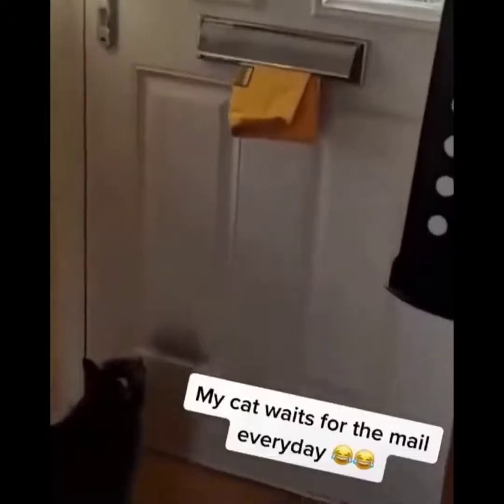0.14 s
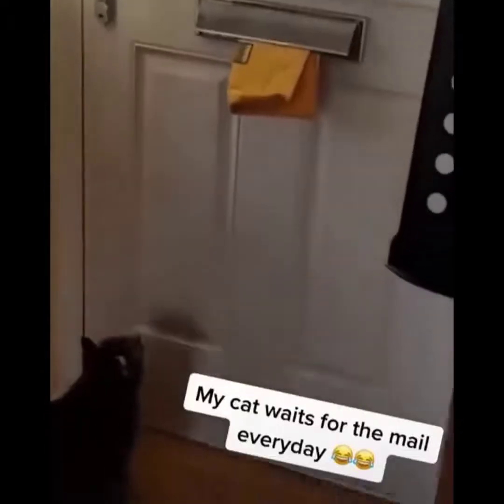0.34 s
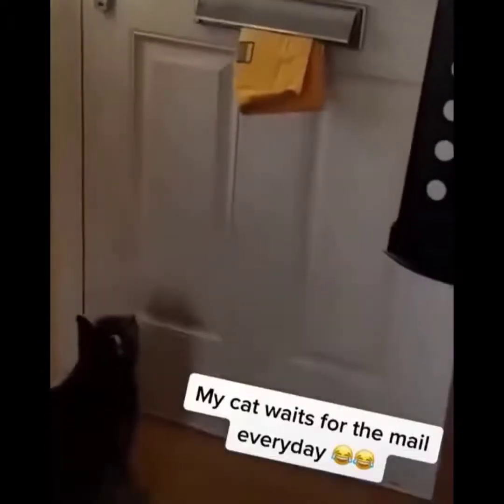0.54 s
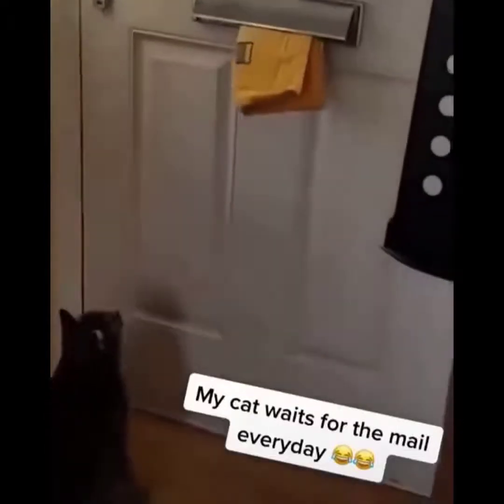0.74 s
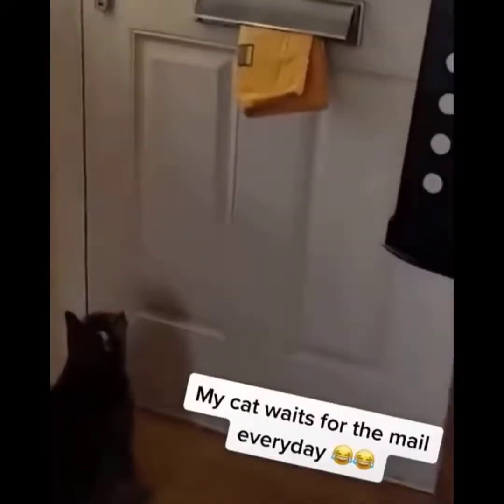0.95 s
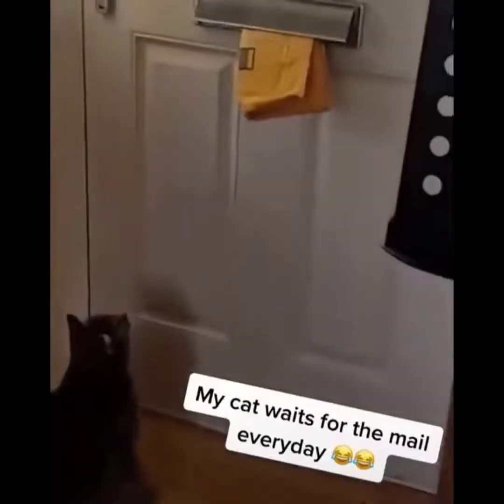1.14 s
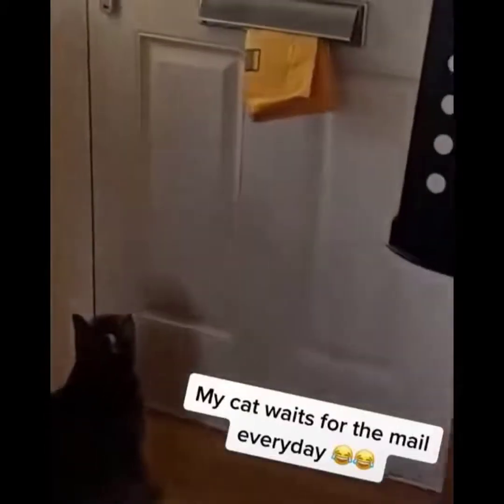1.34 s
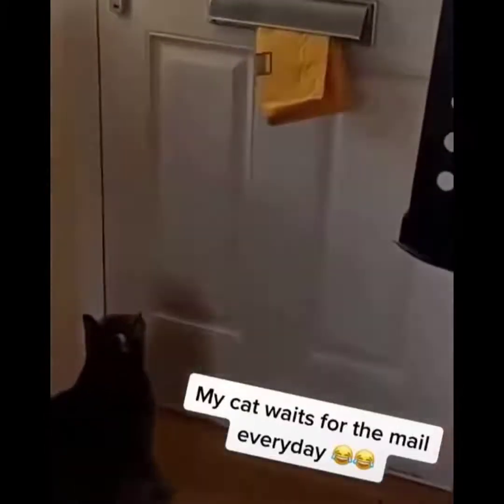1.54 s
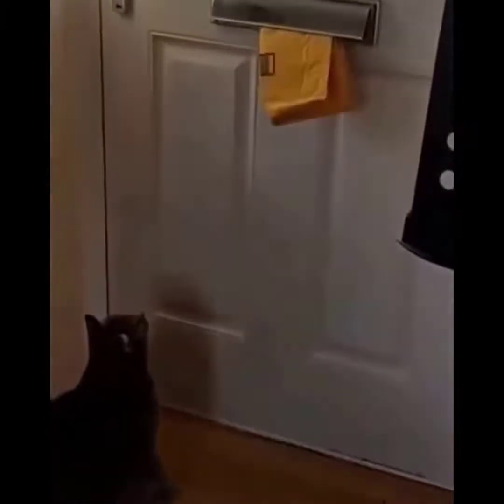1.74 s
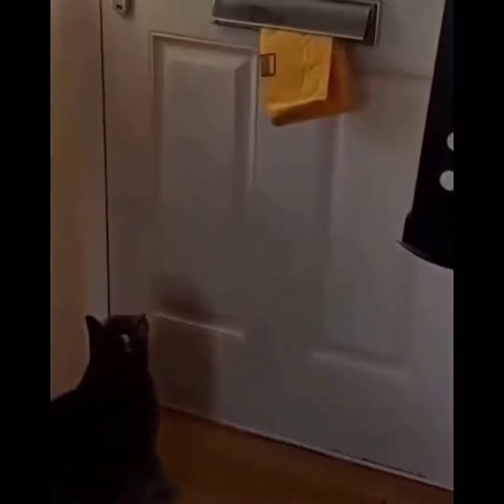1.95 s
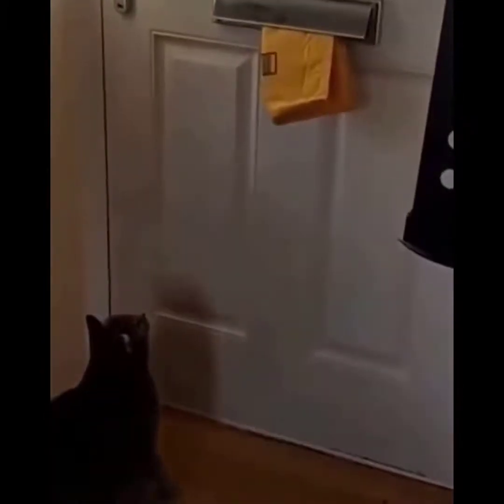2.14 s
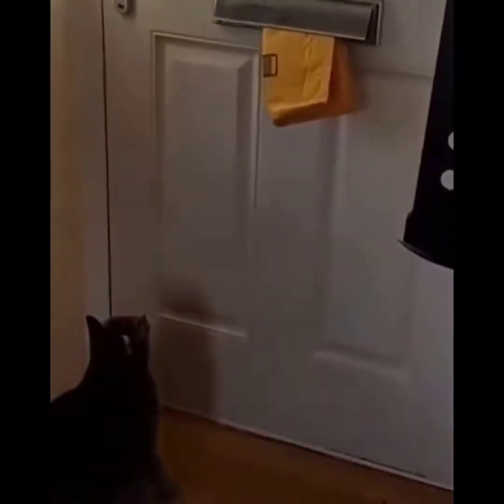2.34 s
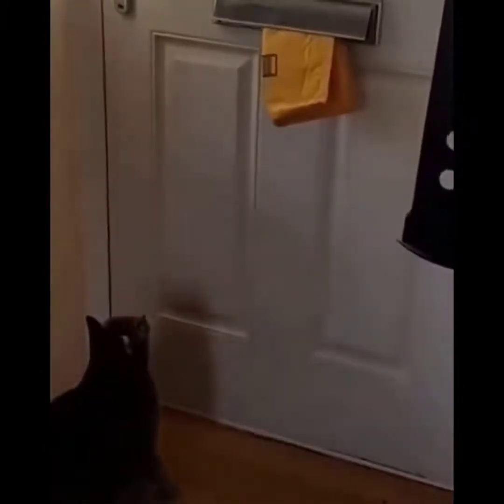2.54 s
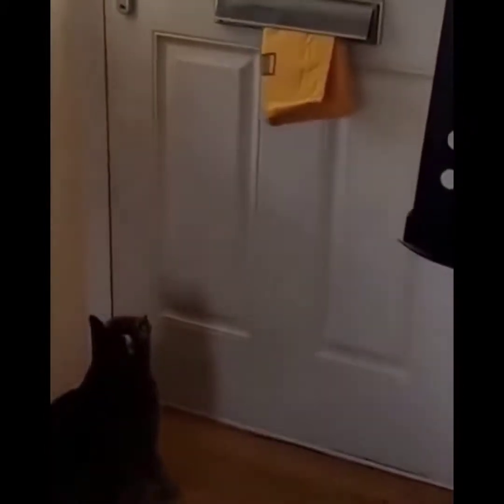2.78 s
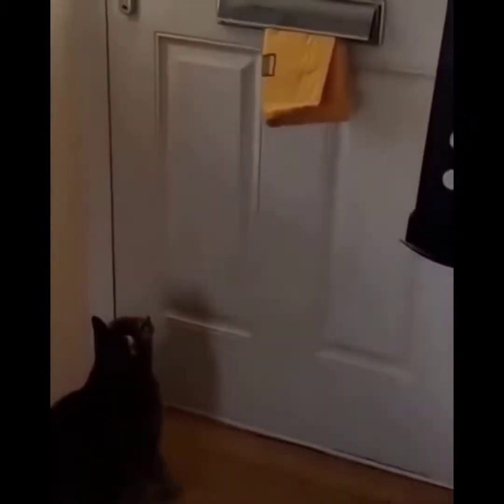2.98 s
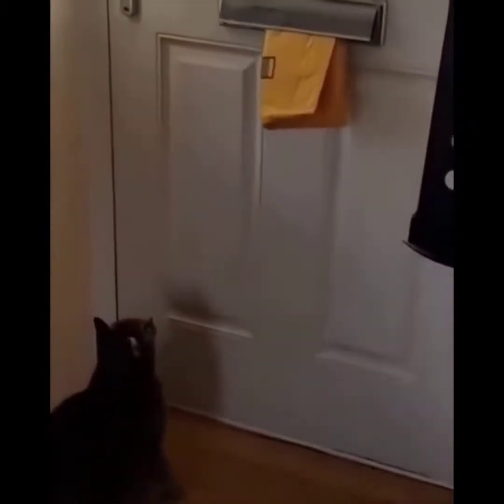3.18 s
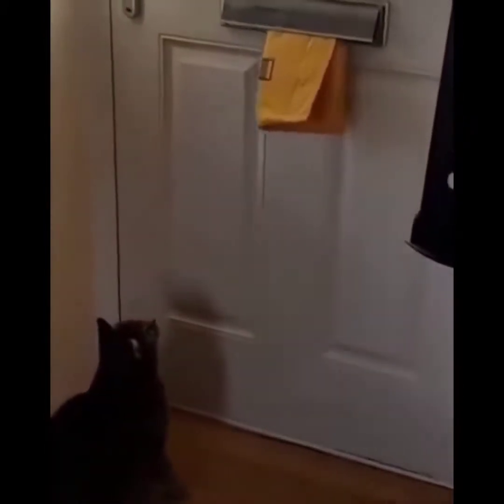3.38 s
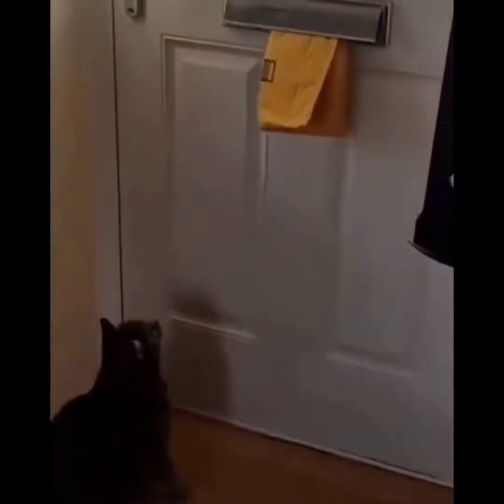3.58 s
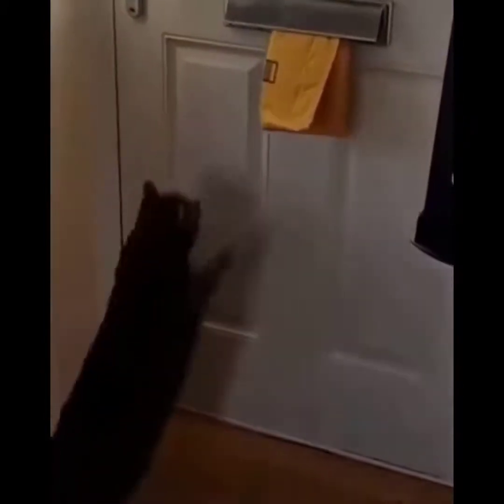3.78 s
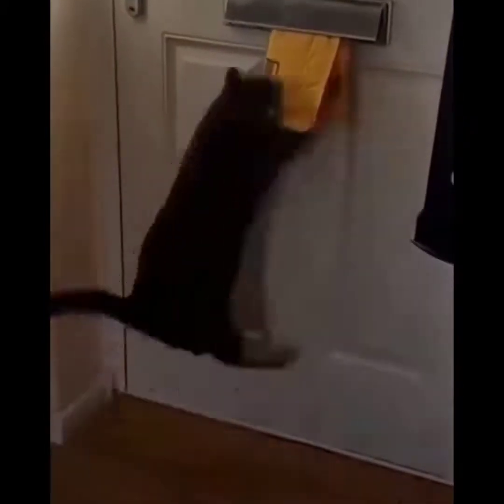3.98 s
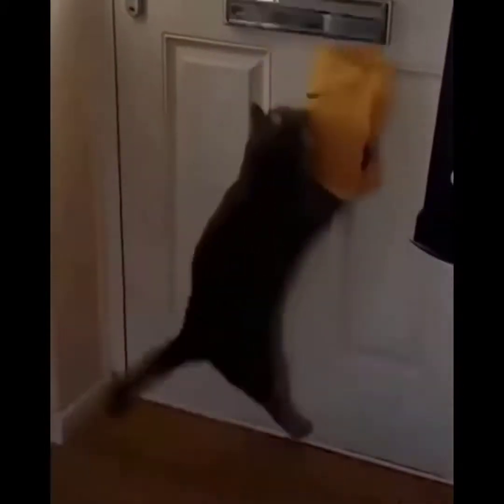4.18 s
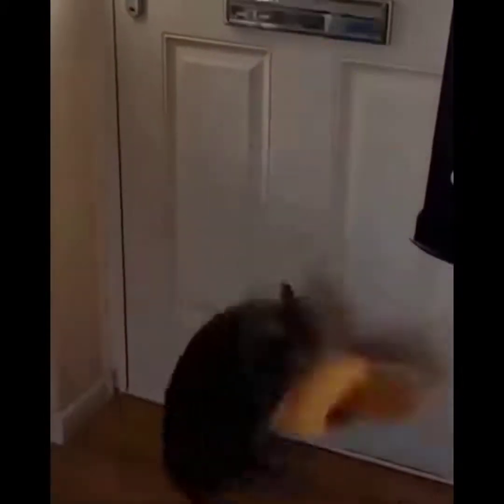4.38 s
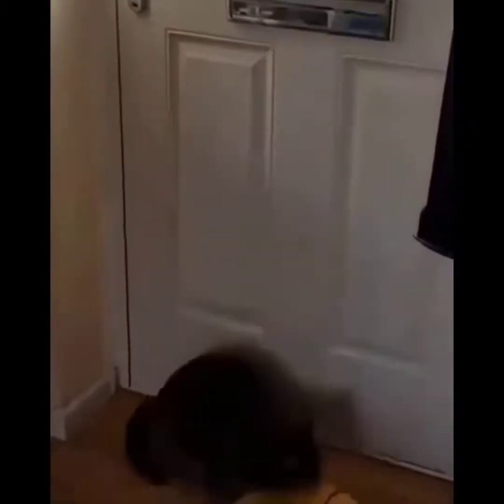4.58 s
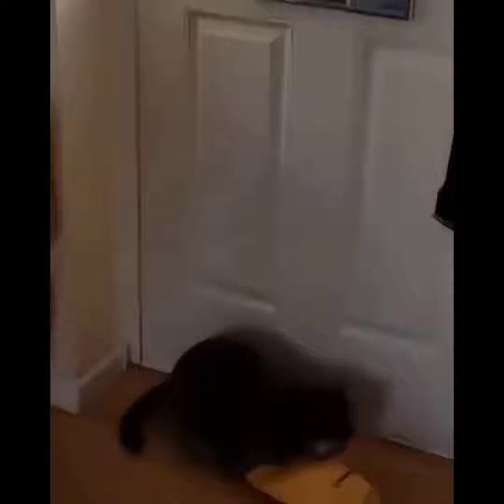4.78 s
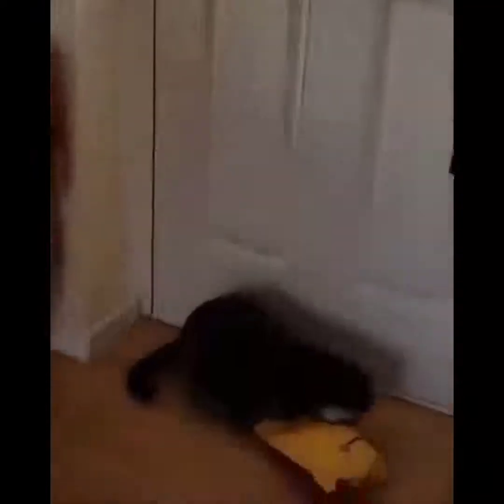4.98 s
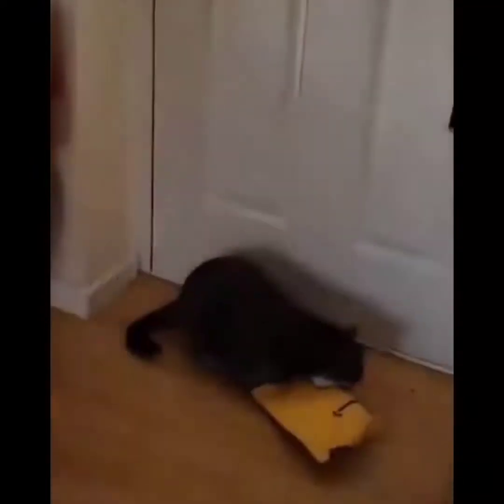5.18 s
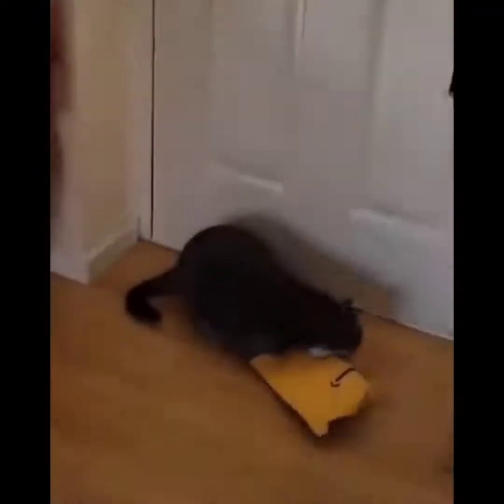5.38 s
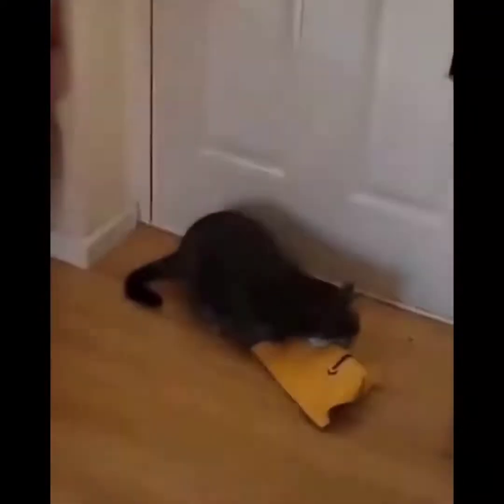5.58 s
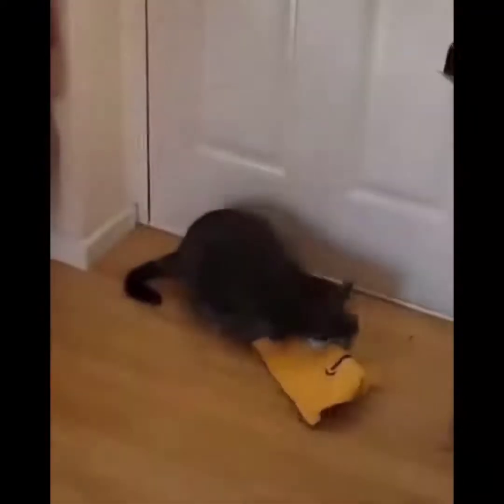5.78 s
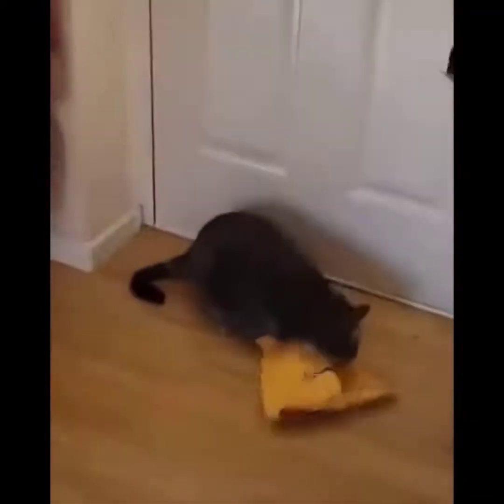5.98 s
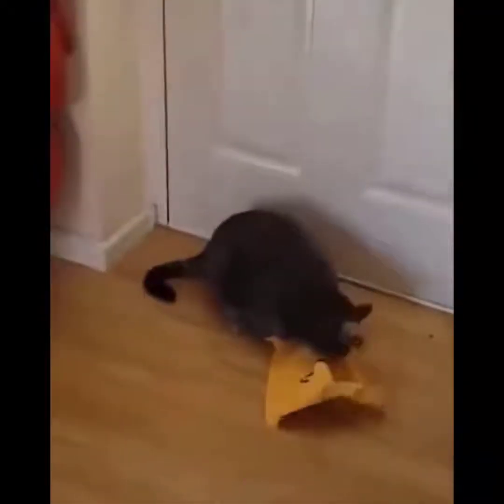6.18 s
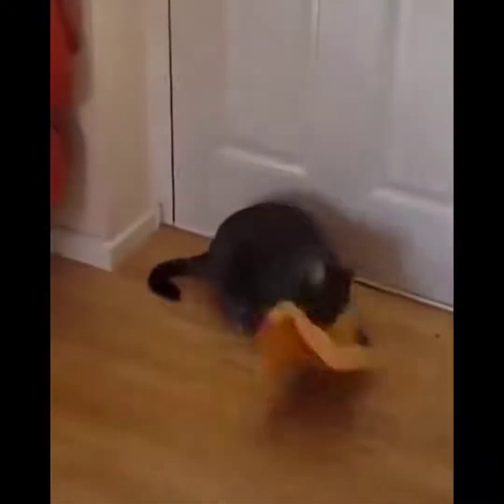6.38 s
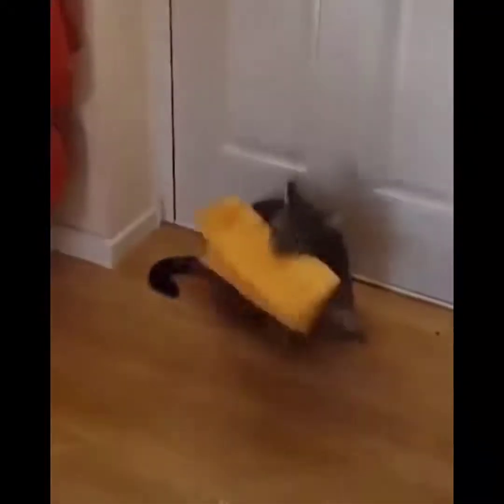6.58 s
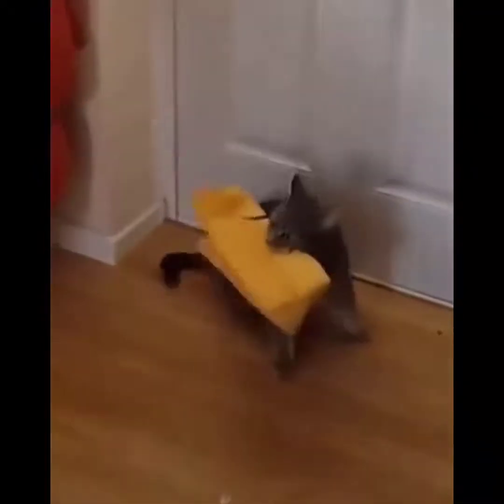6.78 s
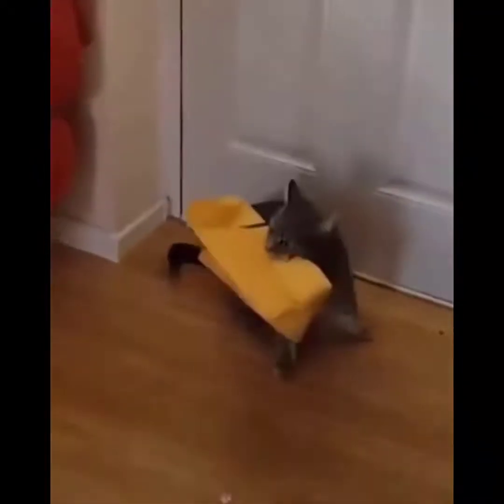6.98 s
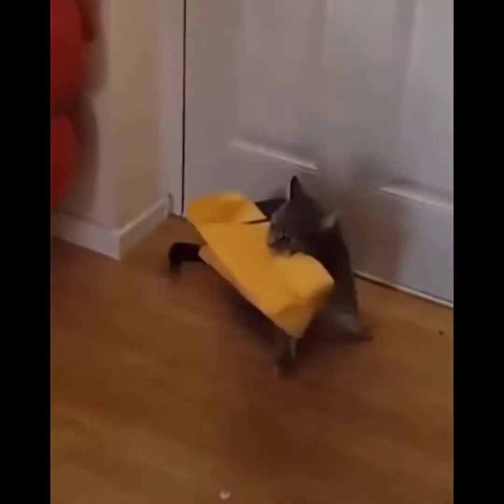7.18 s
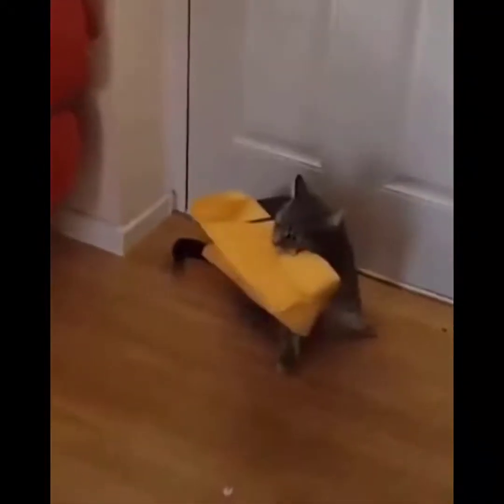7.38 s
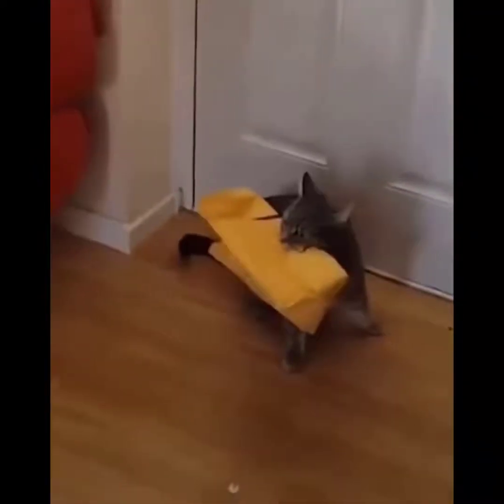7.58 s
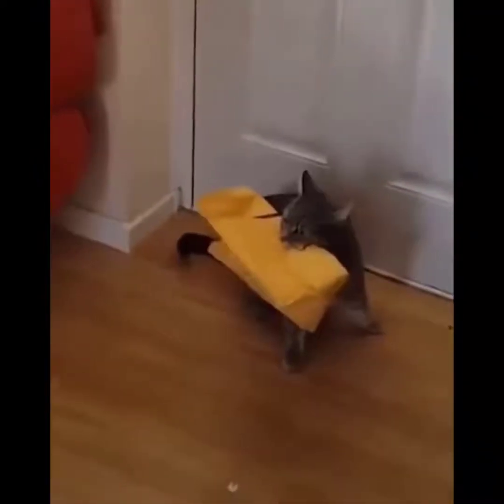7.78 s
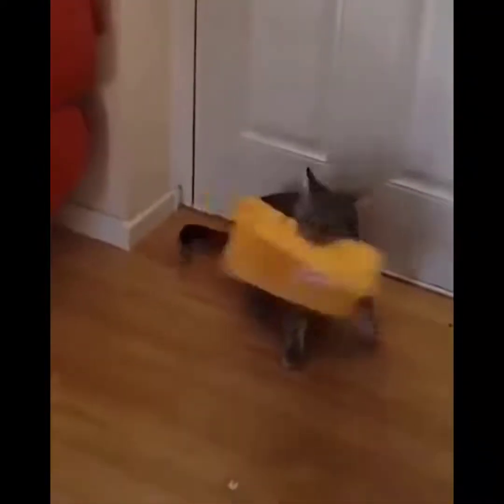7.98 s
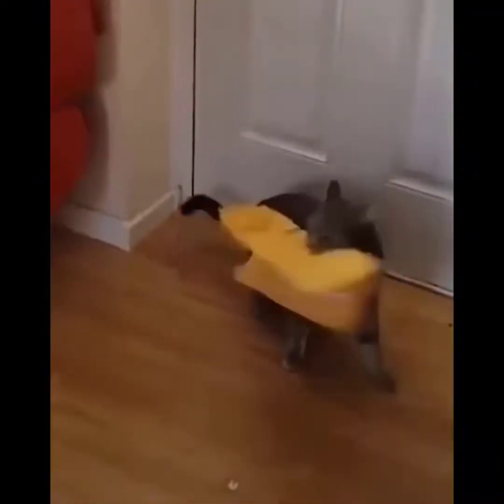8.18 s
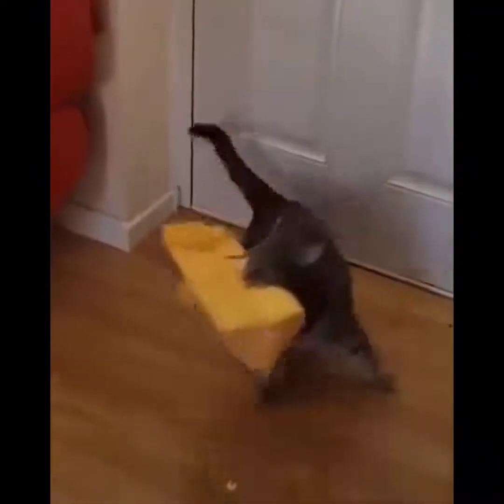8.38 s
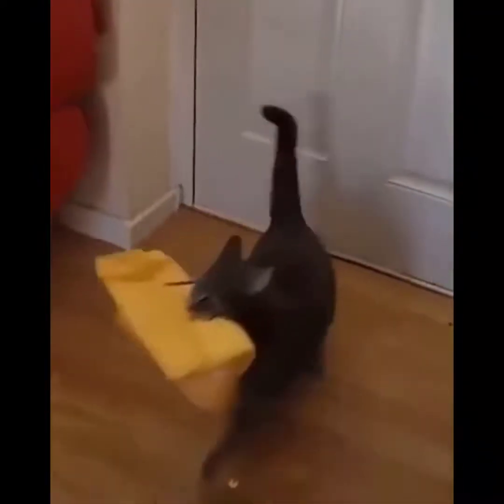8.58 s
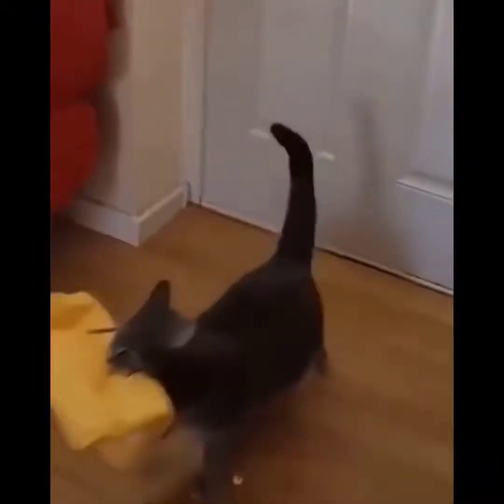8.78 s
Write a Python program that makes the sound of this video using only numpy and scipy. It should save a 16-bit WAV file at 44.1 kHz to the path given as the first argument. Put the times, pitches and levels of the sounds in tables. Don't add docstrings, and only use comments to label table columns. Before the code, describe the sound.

Soft papery rustles and a low engine hum outside open the scene. A harsh scraping rip, heavy wooden door thuds and a bright metal clack burst out, then a sharp flat slap on boards. Claws and teeth prick and crumple the stiff envelope, ending with a tear-like crack, faint rustle and a dull paw landing. Close indoor microphone, short hard-walled echo, muffled extreme treble.

```python
import sys
import numpy as np
from scipy import signal
from scipy.fft import rfft, irfft
from scipy.io import wavfile

SR = 44100
rng = np.random.default_rng(int(sys.argv[2]) if len(sys.argv) > 2 else 0)


def gain_from_db(level_db):
    decades = np.asarray(level_db, float) / 20
    return 10 ** decades


def pcm_store(signal):
    levels = np.round(np.clip(np.atleast_2d(signal), -1, 1) * 32767)
    wavfile.write(sys.argv[1], SR, levels.astype(np.int16).T)


N = 389844


def rms_one(x):
    return x / np.sqrt(np.mean(x ** 2) + 1e-20)


def in_time(rows):
    s, *columns = np.transpose(rows)
    return [np.interp(np.arange(N) / SR, s, c, right=c[-1]) for c in columns]


def at_hz(points, hz):
    point_hz, point_db = np.array(points)[:, 0], np.array(points)[:, 1]
    return np.interp(np.log(hz), np.log(point_hz), point_db)


def drift(rate):
    r = np.exp(-80 * np.pi * rate / SR)
    slow = signal.lfilter([1], [1, -2 * r, r * r], rng.standard_normal(N // 40 + 2002))[2000:]
    return np.interp(np.arange(N) / 40, np.arange(len(slow)), rms_one(slow))


def band(x, low_hz, high_hz, order=2):
    edges_hz = [low_hz, min(high_hz, .45 * SR)]
    return signal.sosfilt(signal.butter(order, edges_hz, "band", fs=SR, output="sos"), x)


def coloured(x, spectrum):
    hz = np.maximum(np.fft.rfftfreq(N, 1 / SR), 1)
    return rms_one(irfft(rfft(x) * gain_from_db(at_hz(spectrum, hz)), N))


def ring(clicks, hz, t60):
    r, w = gain_from_db(-60 / (t60 * SR)), 2 * np.pi * hz / SR
    return signal.lfilter([0, np.sin(w)], [1, -2 * r * np.cos(w), r * r], clicks + 1e-18)


def hall(x, build_s=0.003):
    # (frequency [Hz], t60 [s])
    echo_t60 = [(100, 0.31), (400, 0.25), (1500, 0.41), (4000, 0.36), (12000, 0.17)]
    edges = 22 * 2 ** np.arange(0, 9.4, 1 / 3)
    centres = np.sqrt(edges[1:] * edges[:-1])
    t = np.arange(SR // 2) / SR
    white = rng.standard_normal((2, SR // 2))
    tail = np.zeros(SR // 2)
    for k, (low, high, hz) in enumerate(zip(edges, edges[1:], centres)):
        tail += band(white[k % 2], low, high) * gain_from_db(-60 * t / at_hz(echo_t60, hz))
    tail = tail * (1 - np.exp(-t / build_s))
    return signal.fftconvolve(x, tail / np.sqrt(np.sum(tail ** 2)))[:N]


def stroke(s, hold, level_db, swell, fade):
    t = np.arange(N) / SR - s
    level = level_db + swell * np.minimum(t, 0) - fade * np.maximum(t - hold, 0)
    return gain_from_db(2 * np.maximum(level, -150))


def thuds(blows, modes, hall_db, soft_hz=380, upper_db=1.5):
    push, t = np.zeros((len(modes), N + 2048)), np.arange(2048) / SR
    contact = t * np.exp(-2 * np.pi * soft_hz * t)
    luck_db = rng.normal(0, 2.5, (len(blows), len(modes)))
    for (s, peak_db, deep_db), luck in zip(blows, luck_db):
        mode_db = [db + deep_db * (hz < 120) + upper_db * (hz > 280) for hz, db, t60 in modes]
        gains = gain_from_db(peak_db + np.array(mode_db) + luck)
        at = round(s * SR)
        push[:, at:at + 2048] += np.outer(gains, contact / contact.sum())
    dry = np.zeros(N)
    for k, (p, (hz, db, t60)) in enumerate(zip(push, modes)):
        dry += ring(p[:N], hz, t60) * (-1) ** k
    return dry + gain_from_db(hall_db) * hall(dry)


def hiss():
    # (frequency [Hz], level [dB per Hz])
    hiss_colour = [(120, -32.5), (200, -6.5), (300, -12), (800, -12.5), (1500, -16), (6000, -14),
                   (9000, -9.5), (13500, -8.5)]
    return gain_from_db(-58 + 0.18 * drift(23)) * coloured(rng.standard_normal(N), hiss_colour)


def street():
    # (time [s], firing rate [Hz], load [dB])
    engine = [(0.0, 86.3, -55), (0.07, 85.4, -46), (0.25, 87.2, -48.5), (0.305, 87.6, -54),
              (0.35, 87.8, -49), (0.47, 90.6, -49.5), (0.56, 89.4, -62), (0.63, 92.6, -70),
              (0.78, 91.1, -63.5), (0.95, 91.9, -71), (1.09, 89.4, -57.5), (1.2, 88.4, -66.5),
              (1.55, 75.7, -57), (2.18, 66.5, -61), (2.58, 69.5, -52), (2.91, 71.6, -48.5),
              (3.1, 73, -59.5), (3.81, 78.6, -63.5)]
    # (frequency [Hz], level [dB])
    through_door = [(65, -12.5), (75, 4), (90, -8.5), (135, -13.5), (155, -4), (180, 6)]
    # (time [s], level [dB])
    traffic = [(0.0, -47), (0.78, -53.5), (2.9, -56.5), (3.27, -58.5), (5.27, -57.5), (6.5, -51),
               (6.82, -58.5), (8.84, -60)]
    # (frequency [Hz], level [dB per Hz])
    rumble_colour = [(12, -48.5), (20, -22), (32, -14), (70, -5), (147, -12.5), (304, -27), (400, -43.5),
                     (880, -120)]
    # (time [s], hold [s], level [dB])
    shudders = [
        (4.15, .3, -41.5),
        (4.45, .2, -37.5),
        (8.36, 0.056, -46.5),
    ]
    hz, load_db = in_time(engine)
    first_db = load_db + at_hz(through_door, hz)
    second_db = load_db + at_hz(through_door, 2 * hz)
    turn = 2 * np.pi * np.cumsum(hz * (1 + 0.0041 * drift(5.4))) / SR
    first = gain_from_db(first_db + 0.7 * drift(6)) * np.sin(turn)
    second = gain_from_db(second_db + 0.8 * drift(10)) * np.sin(2 * turn)
    fade = np.clip((4.3 - np.arange(N) / SR) * 10, 0, 1)
    shaking = sum(stroke(*row, swell=170, fade=78) for row in shudders)
    strength = np.sqrt(gain_from_db(2 * in_time(traffic)[0]) + shaking)
    rumble = strength * gain_from_db(1.2 * drift(8)) * coloured(rng.standard_normal(N), rumble_colour)
    return np.sqrt(2) * fade * (first + second) + rumble


def handling():
    pushes = [(0.036, 0.042, -36, -15.5, -7.5), (0.253, 0.023, -28, -14.5, -12),
              (0.686, 0.064, -36, -18, -14.5), (1.039, 0.04, -37.5, -23.5, -11),
              (1.128, 0.0047, -34.5, -20, -31), (1.249, 0.016, -43.5, -11, -64),
              (1.559, 0.0094, -40, -18.5, -15), (1.677, 0.016, -44, -17.5, -17),
              (1.832, 0.14, -49.5, -13.5, -22), (2.254, 0.11, -47.5, -5, -29), (2.46, 0.19, -50, -4, -37),
              (2.983, 0.093, -44, -21, -17), (3.236, 0.045, -44, -24, -13), (3.351, 0.063, -44.5, -22, -15),
              (3.539, 0.067, -40, -18.5, -10.5), (3.804, 0.0074, -39.5, -19, -11),
              (3.969, 0.14, -51.5, -18, -10)]
    rips = [(4.152, 0.04, -17, -20, -4.5), (4.55, .08, -36.5, -8, -22), (4.22, 0.043, -19, -13, -20),
            (4.32, 0.12, -24, -14.5, -17.5), (4.39, .025, -13, -2, -6.5), (4.128, .01, -29.5, -18.5, -13),
            (4.27, .02, -20, -14, -20)]
    landings = [(4.678, 0.0026, -9, -4.5, -38)]
    tears = [(6.447, 0.003, -15, -12, -23.5)]
    chews = [(4.919, 0.077, -41, -6, -21), (5.15, 0.011, -33, -18, -24), (5.182, 0.0052, -36.5, -24, -26),
             (5.232, 0.0043, -37, -14, -19), (5.305, 0.023, -34, -12.5, -27),
             (6.288, 0.0092, -28.5, -21.5, -8.5), (5.268, 0.017, -36, -11, -11.5),
             (5.4, 0.26, -38.5, -10, -14), (5.769, 0.077, -30, -7.5, -24), (6.019, 0.17, -36.5, -32, -9.5),
             (6.165, 0.095, -29.5, -12.5, -12), (6.32, 0.15, -34.5, -18.5, -10.5),
             (6.521, 0.084, -29, -15.5, -12), (6.989, 0.0079, -54.5, -9.5, -10),
             (7.3, 0.019, -59.5, -7.5, -10.5), (7.67, .01, -62, -16.5, -6.5), (8.63, 0.026, -60, -9.5, 2),
             (8.838, 0.0099, -61, -16, -2)]
    scuffs = [(8.29, 0.035, -43, 6.6, -30)]
    kinds = [(pushes, 147, 108), (rips, 450, 145), (landings, 5100, 158.5),
             (tears, 1100, 770), (chews, 290, 154), (scuffs, 750, 210)]
    power = np.zeros((3, N))
    for rows, swell, fade in kinds:
        for s, hold, level_db, body_db, sheen_db in rows:
            shares = gain_from_db(2 * np.array([0, body_db, sheen_db]))
            power += np.outer(shares, stroke(s, hold, level_db, swell, fade))
    return np.sqrt(power)


def rustle(per_s=1800, spread_db=2.0, smooth=1.4, hall_db=-11.5):
    in_slot = [(250, 2), (500, 0.5), (900, 1.5), (1500, -1.5), (2600, 0), (4000, -2.5), (6000, -5),
               (8000, -3)]
    pulled = [(250, -0.5), (500, -6), (850, -5.5), (1300, -5), (2500, -6), (4500, -7), (6500, -7.5),
              (8000, -8)]
    chewed = [(250, 0), (500, -8.5), (900, -7.5), (1500, -7.5), (3000, -4.5), (4500, -8), (6200, -11),
              (8000, -5)]
    dragged = [(250, -9), (700, -10.5), (1160, -13.5), (2260, -3.5), (4500, -7.5), (8000, -9)]
    patch_edges = [700, 900, 1150, 1450, 1800, 2200, 2700, 3300, 4000, 4800, 5700, 6900, 8500]
    middle_gain, body_gain, sheen_gain = handling()
    sizes = gain_from_db(spread_db * np.minimum(rng.exponential(1, N), 5)) * rng.choice([-1, 1], N)
    creases = sizes * (rng.random(N) < per_s * gain_from_db(5 * drift(25)) / SR)
    grain = rms_one(creases) + smooth * rng.standard_normal(N)
    t = np.arange(N) / SR
    stage = (t > 4.09).astype(int) + (t > 4.66) + ((t > 6.56) & (t < 7.2))
    paper = np.choose(stage, [coloured(grain, s) for s in (in_slot, pulled, chewed, dragged)])
    body = -band(paper, 250, 700)
    middle = np.zeros(N)
    for k, (low, high) in enumerate(zip(patch_edges, patch_edges[1:])):
        middle += band(paper, low, high) * gain_from_db(3 * drift(16)) * (-1) ** k
    sheen = band(grain, 8200, 14000, order=4) * gain_from_db(2.5 * drift(8))
    dry = middle_gain * rms_one(middle) + body_gain * rms_one(body)
    dry = dry + sheen_gain * gain_from_db(5) * rms_one(sheen)
    flutter_db = 0.8 * drift(10) + 1.8 * drift(45)
    dry = gain_from_db(-4 + flutter_db) * dry
    return dry + gain_from_db(hall_db) * hall(dry)


def snaps():
    # (time [s], peak [dB], body below 1.3 kHz [relative dB], edge above 5 kHz [relative dB])
    crease_rows = [(0.065, -24, -45, -4.5), (0.25, -26, -12, -15), (0.648, -37.5, -8, -15),
                   (1.12, -21.5, -17, -33), (2.322, -30, 1, -27), (2.615, -35, 0, -15),
                   (3.346, -39.5, -9.5, -2), (4.112, -25.5, -14, 6), (4.125, -18.5, -8.5, -7),
                   (4.148, -27, -14, -0.5), (4.378, -9, -1, -1), (4.6786, -2, -13, -11),
                   (5.1074, -29, -10, -4), (5.1454, -20.5, -21, -23), (5.183, -24.5, -27, -13.5),
                   (5.234, -34.5, 0.5, 3.5), (5.299, -23.5, -2, -33), (5.6264, -25, 2, -11.5),
                   (5.78, -21, -7, -39), (5.8274, -16.5, -8.5, -17.5), (6.424, -24.5, -7, -21),
                   (6.4415, -11.5, -10.5, -13), (6.449, -13.5, -9, -25), (8.826, -43.5, -18, 6.5),
                   (6.198, -31, 4, -25), (6.463, -24, -18, -30)]
    dry = np.zeros(N + 4096)
    t = np.arange(4096) / SR
    shape = np.exp(-t / .0033) * (1 - np.exp(-t / .0016))
    draws = rng.standard_normal((len(crease_rows), 4096))
    for (s, peak_db, body_db, edge_db), noise in zip(crease_rows, draws):
        burst = noise * np.abs(noise) * shape
        parts = [band(burst, low, high, order=3)
                 for low, high in ((350, 1300), (1300, 5000), (5000, 15000))]
        body, middle, edge = [p / np.abs(p).max() for p in parts]
        crackle = gain_from_db(body_db) * body + middle + gain_from_db(edge_db + 9.5) * edge
        at = round(s * SR)
        dry[at:at + 4096] += gain_from_db(peak_db) * crackle
    return dry[:N] + gain_from_db(-2) * hall(dry[:N])


def ticks():
    # (time [s], peak [dB], lowest frequency [Hz])
    pricks = [(1.121, -25, 700), (4.6795, 3, 700), (4.3795, -5, 2900), (5.144, -20, 900),
              (5.2995, -20, 1100), (5.4242, -16, 2500), (5.444, -22, 3200), (5.5515, -15, 4000),
              (5.5535, -12, 4000), (5.6245, -21, 700), (6.4435, -9, 900), (6.451, -8, 1500),
              (2.3245, -29, 900), (6.446, -6, 900), (8.828, -37, 2000)]
    out, t = np.zeros(N), np.arange(256) / SR
    for (s, peak_db, low_hz), noise in zip(pricks, rng.standard_normal((len(pricks), 256))):
        high_hz = min(5.5 * low_hz, 15000)
        prick = band(noise * np.exp(-t / .0009), low_hz, high_hz)
        at = round(s * SR)
        out[at:at + 256] += gain_from_db(peak_db) * prick / np.abs(prick).max()
    return out


def knocks(width=.26):
    # (time [s], peak [dB], pitch [Hz], length [s])
    resonant_hits = [(1.663, -31, 2950, .011), (2.262, -43, 800, .006), (2.319, -36, 730, .0048),
                     (2.497, -39, 2500, .0084), (2.613, -30, 1180, .013), (3.525, -40, 5270, .02),
                     (4.15, -17, 2490, .012), (4.172, -18, 860, .02), (4.182, -19, 1200, .012),
                     (4.2, -18, 3300, .01), (4.26, -18, 1350, .006), (4.385, -10.5, 11250, .035),
                     (4.392, -12, 1194, .035), (4.42, -7.5, 159, .017), (4.64, -18.5, 330, .005),
                     (4.675, -8.5, 546, .0027), (4.678, -19, 1550, .03), (5.112, -29, 630, .0049),
                     (5.228, -30, 4050, .005), (5.235, -35, 650, .003), (5.277, -37, 750, .008),
                     (5.297, -31, 1290, .0068), (5.619, -31, 610, .009), (5.628, -35, 4900, .006),
                     (6.198, -28, 895, .011), (6.282, -28, 4400, .02), (6.444, -18, 4700, .006),
                     (6.45, -18, 2800, .012), (6.563, -29, 3850, .012), (6.975, -53, 1607, .024),
                     (7.348, -58.5, 1007, .031), (8.291, -35, 1550, .02), (8.608, -46, 5120, .043),
                     (8.736, -54.5, 507, .03)]
    dry = np.zeros(N + 8192)
    t = np.arange(8192) / SR
    draws = rng.standard_normal((len(resonant_hits), 8192))
    for (s, peak_db, hz, length), noise in zip(resonant_hits, draws):
        push = noise * np.exp(-t / length) * (1 - np.exp(-t / 0.0048))
        knock = band(push, hz * (1 - width / 2), hz * (1 + width / 2))
        at = round(s * SR)
        dry[at:at + 8192] += gain_from_db(peak_db) * knock / np.abs(knock).max()
    return dry[:N] + gain_from_db(-11) * hall(dry[:N])


def floor_blows():
    # (time [s], peak [dB], deep modes [relative dB])
    blows = [(2.312, -45, 0), (5.108, -50, -10), (5.425, -42, -20), (5.46, -36, -20), (5.5, -38, -20),
             (5.535, -41, -20), (5.57, -41, -20), (5.619, -23.5, -33), (5.79, -27.5, -12),
             (5.829, -19, -29), (6.207, -54, -15), (6.433, -26, -12), (6.572, -28.5, -13),
             (6.587, -34, -11), (6.36, -33.5, -13), (8.737, -52, 3)]
    # (frequency [Hz], level [dB], t60 [s])
    boards = [(68, -6.5, 0.25), (81.4, -3.5, 0.17), (167.2, -8.5, 0.11), (217, -5.5, 0.087),
              (330, -2.5, 0.038), (460.3, -15.5, 0.18), (593, -24.5, .07)]
    return thuds(blows, boards, hall_db=-2.5)


def flap_drag():
    # (time [s], hold [s], level [dB])
    drags = [
        (4.175, 0.029, -24.5),
        (4.255, .02, -27),
        (4.39, .03, -23.5),
        (2.97, 0.066, -56),
        (3.3, 0.23, -62.5),
    ]
    # (frequency [Hz], width [Hz], level [dB])
    creaks = [(853, 50, -1), (1220, 87, -1.5), (1460, 90, -6.5), (2014, 67, -7), (2300, 90, -6),
              (2510, 41, -6.5)]
    power = sum(stroke(*row, swell=580, fade=220) for row in drags)
    slips = rng.standard_normal(N) ** 3 * np.sqrt(power) / 4
    out = np.zeros(N)
    for hz, width, db in creaks:
        creak = ring(slips, hz, 2.2 / width) * np.sqrt(4 * np.pi * width / SR)
        out += gain_from_db(db + 2.7 * drift(28)) * creak
    return out


def door_blows():
    # (time [s], peak [dB], deep modes [relative dB])
    blows = [(4.189, -20.5, -6.5), (4.221, -11, 0), (4.244, -16, 1.5), (4.29, -20.5, -1), (4.328, -20, 2),
             (4.371, -2.5, 0), (4.39, 6, -12.5), (4.405, 3, 0), (4.427, -4.5, -2.5), (4.447, -17.5, -5),
             (4.479, -14, 0), (4.517, -27, 1), (4.64, -20, -6), (4.677, -15, -19)]
    door_hz = [68, 100, 155, 209, 250, 335, 410, 463, 596, 717, 125, 866, 1206]
    # (level [dB], t60 [s])
    door_ring = [(-6, 0.12), (-10.5, 0.25), (-12.5, 0.26), (-2, 0.11), (-4, 0.071), (-8, 0.063),
                 (-12, 0.031), (-18, 0.19), (-16.5, 0.11), (-7, 0.11), (-12, 0.09), (-15.5, .15),
                 (-11, .15)]
    door = [(hz, db, t60) for hz, (db, t60) in zip(door_hz, door_ring)]
    return thuds(blows, door, hall_db=-13.5)


def flap():
    # (time [s], level [dB])
    claps = [
        (4.383, -20),
        (4.679, -28.5),
    ]
    # (frequency [Hz], level [dB], t60 [s])
    metal_modes = [(4832, -9, .3), (5372, -8, .2), (6530, -9, .2), (7423, 0, .2), (7628, -2, .3),
                   (8177, 0, .15), (9150, -8, .2), (9819, 0, .42), (10508, -2, .4), (11320, -12, .15),
                   (11890, -6, .28), (12305, -13, .25)]
    at, out = [round(s * SR) for s, db in claps], np.zeros(N)
    for hz, level_db, t60 in metal_modes:
        clicks = np.zeros(N)
        clicks[at] = gain_from_db(np.array(claps)[:, 1] + level_db + rng.normal(0, 1.2, len(at)))
        out += ring(clicks, hz, t60)
    return out


def slap():
    # (frequency [Hz], level [dB], t60 [s])
    skin_modes = [(2070, -27.5, 9.3), (2190, -7, 0.74), (2680, 0.5, 0.28), (3170, -6.5, 0.2),
                  (3540, 1.5, 0.24), (4070, -10, 0.35), (3860, -6, 0.31), (4340, -16, 0.29),
                  (4810, -6, 0.32), (4780, -7.5, 0.19), (6050, 1.5, 0.14), (6300, -7.5, 0.22)]
    click = np.zeros(N)
    click[round(4.679 * SR)] = gain_from_db(-35)
    return sum(gain_from_db(db) * ring(click, hz, min(t60, .33)) for hz, db, t60 in skin_modes)


def thump():
    # (time [s], peak [dB], deep modes [relative dB])
    blows = [
        (8.264, -35.5, 4),
        (8.2755, -21, 2),
        (8.287, -17, 0),
        (8.31, -28, -8),
    ]
    # (frequency [Hz], level [dB], t60 [s])
    joists = [(67.4, -8.5, 0.35), (85.6, -4, 0.19), (164, -8, .13), (194.7, -5, 0.33), (214, -3, .1),
              (331, -9, 0.13), (439, -14.5, 0.15), (535, -15.5, 0.15), (675, -18, 0.14), (810, -26, 0.086)]
    return thuds(blows, joists, hall_db=-11.5, soft_hz=500, upper_db=-1.5)


def scene():
    outside = hiss() + street()
    envelope = rustle() + snaps() + ticks() + knocks() + slap()
    door_and_floor = floor_blows() + flap_drag() + door_blows() + flap() + thump()
    return (outside + envelope + door_and_floor)[None]


def round_masked_sounds(x, slope_db, luck_db, attack_db, block=1024, band_bins=8):
    # (frequency [Hz], margin [dB])
    mask_margin = [(300, 24), (1200, 7), (2500, 0), (4000, -3.5), (7000, -4.5), (10000, -1), (16000, -2)]
    n, k = np.arange(2 * block), np.arange(block)
    window = np.sin(np.pi * (n[:, None] + .5) / (2 * block))
    waves = np.cos(np.pi / block * np.outer(n + .5 + block / 2, k + .5))
    basis = waves * window * np.sqrt(2 / block)
    halves = np.pad(x, (block, 2 * block - N % block)).reshape(-1, block)
    frames = np.hstack([halves[:-1], halves[1:]])
    lines = (frames @ basis).reshape(len(frames), -1, band_bins)
    band_db = 10 * np.log10(np.mean(lines ** 2, axis=2) + 1e-14)
    index = np.arange(band_db.shape[1])
    reach_db = slope_db * np.abs(index[:, None] - index) + 99 * (index < 9)
    mask_db = np.max(band_db[:, None, :] - reach_db, axis=2)
    luck = signal.lfilter([.8], [1, -.6], rng.standard_normal(band_db.shape), axis=0)
    band_hz = (index + .5) * band_bins * SR / (2 * block)
    step = gain_from_db(mask_db - at_hz(mask_margin, band_hz) + luck_db * luck)
    change = np.diff(frames, prepend=0).reshape(len(frames), -1, 128)
    change_db = 10 * np.log10(np.mean(change ** 2, axis=2) + 1e-14)
    step[np.max(change_db[:, 2:] - change_db[:, :-2], axis=1) > attack_db] *= .25
    step = step[:, :, None]
    rounded = np.sign(lines) * np.floor(np.abs(lines) / step + .4) * step
    back = rounded.reshape(len(frames), block) @ basis.T
    return (back[1:, :block] + back[:-1, block:]).ravel()[:N]


def top_cut(x):
    return signal.sosfilt(signal.butter(12, 15960, fs=SR, output="sos"), x)


def record(dry):
    # (frequency [Hz], level [dB])
    overall_tone = [(5500, 0), (6800, -5), (8100, -17), (9600, -8.5), (12300, -7.5), (13000, -15),
                    (13700, -36), (16000, -48)]
    hz = np.maximum(np.fft.rfftfreq(N, 1 / SR), 1)
    heard = irfft(rfft(dry[0]) * gain_from_db(at_hz(overall_tone, hz)), N)
    limited = .89 * np.tanh(heard / .89)
    stored = round_masked_sounds(limited, slope_db=.95, luck_db=3.5, attack_db=8)
    return top_cut(stored[None])


dry = scene()
out = record(dry)
pcm_store(out)
```